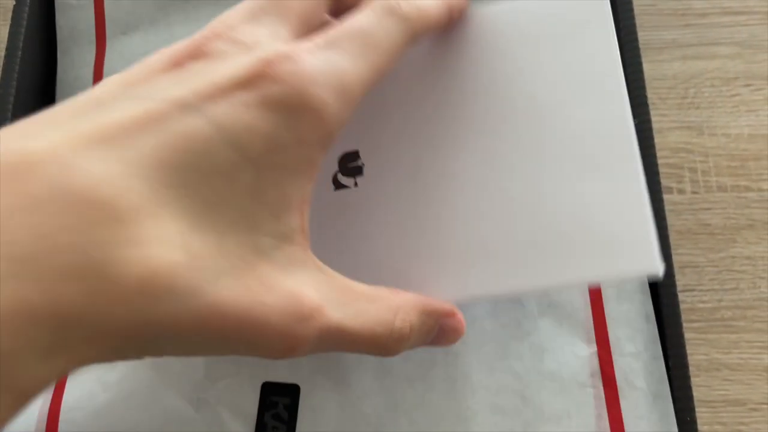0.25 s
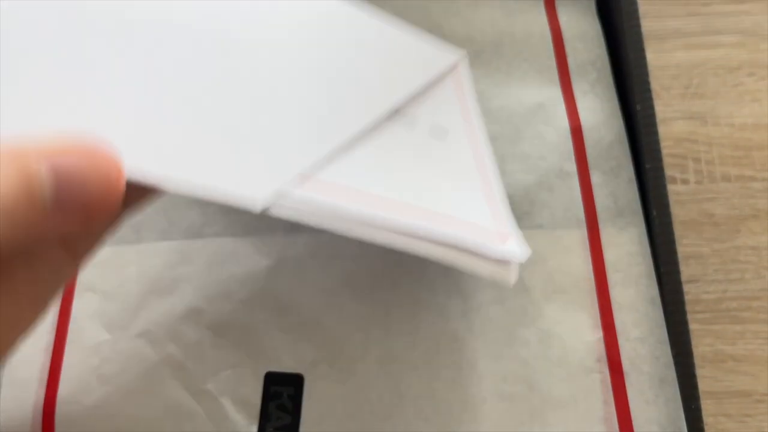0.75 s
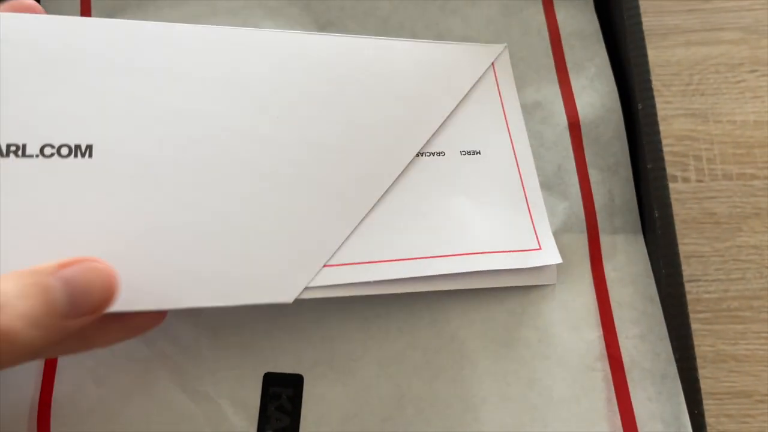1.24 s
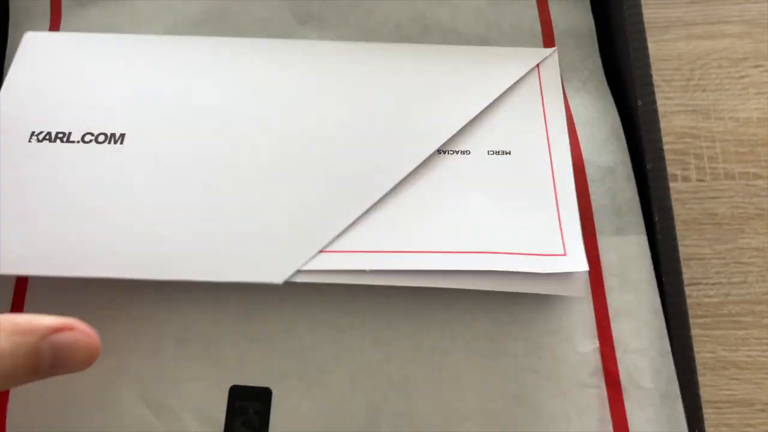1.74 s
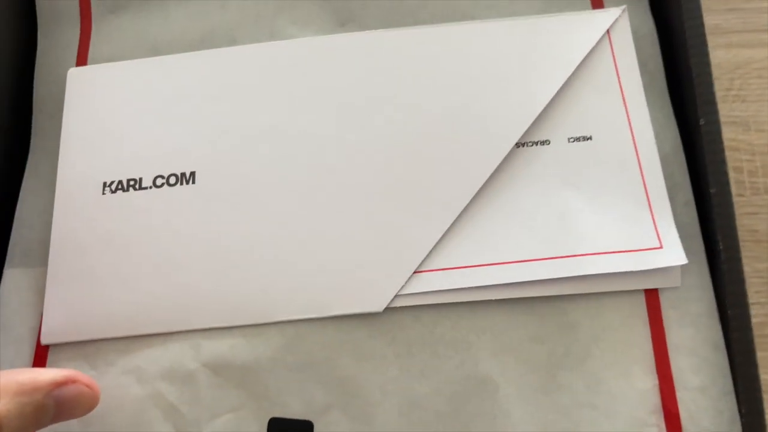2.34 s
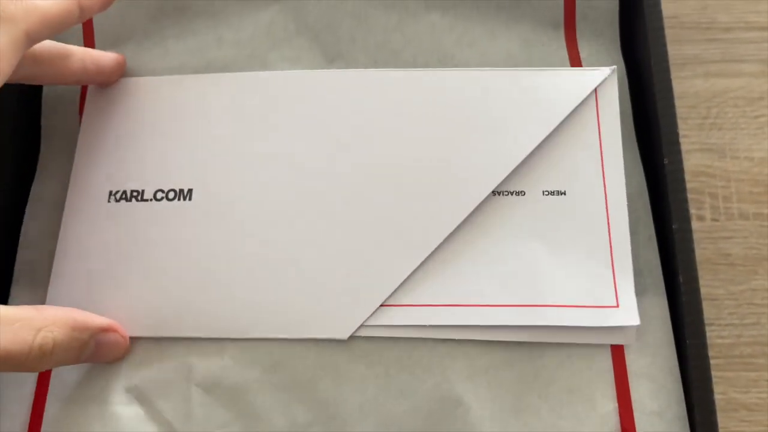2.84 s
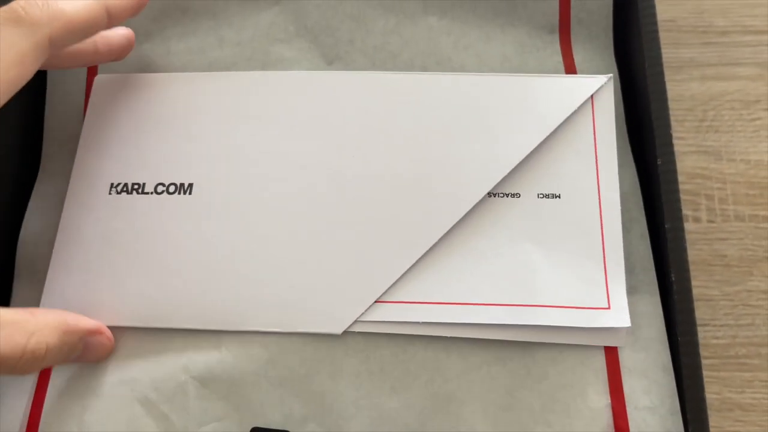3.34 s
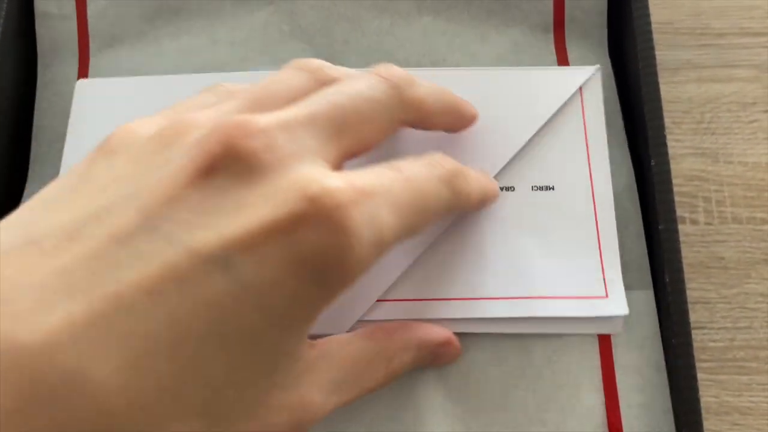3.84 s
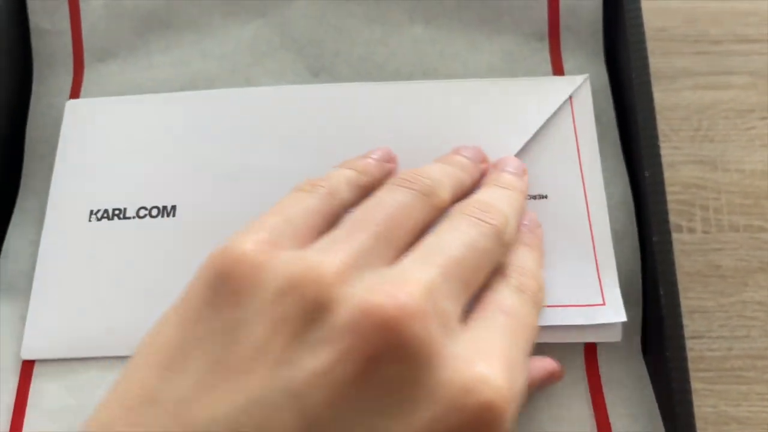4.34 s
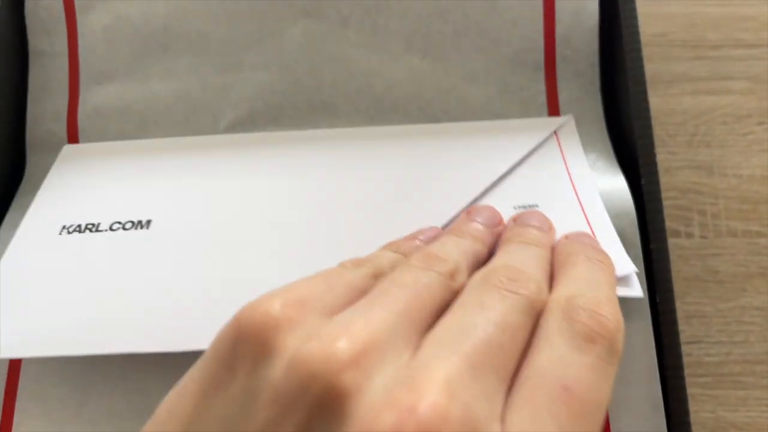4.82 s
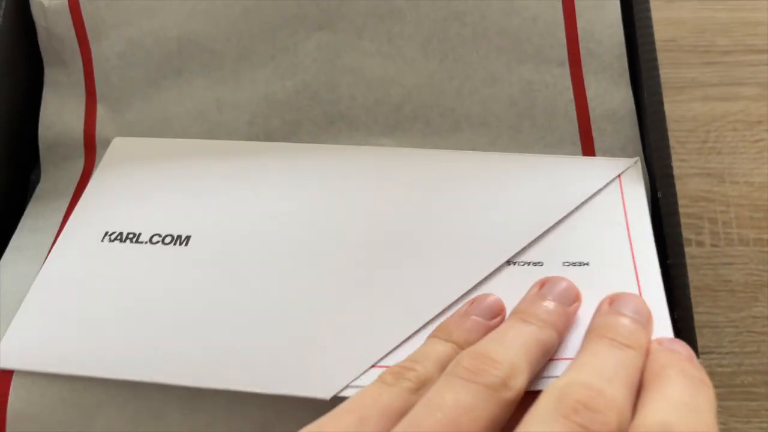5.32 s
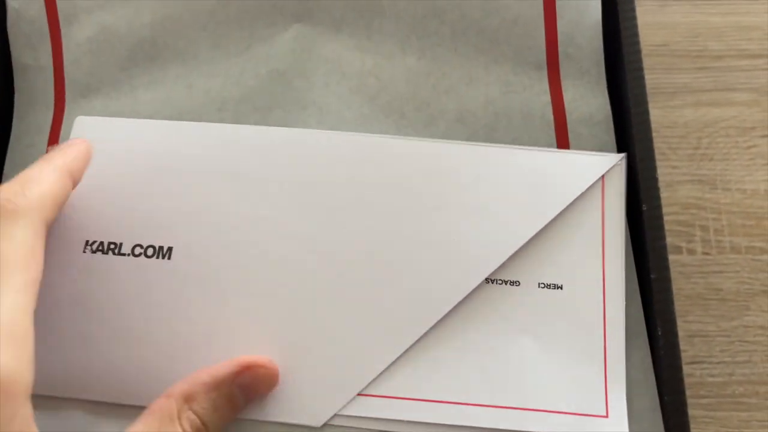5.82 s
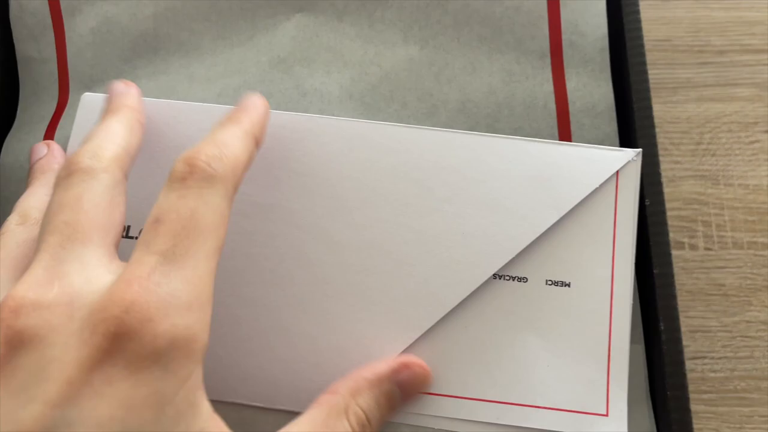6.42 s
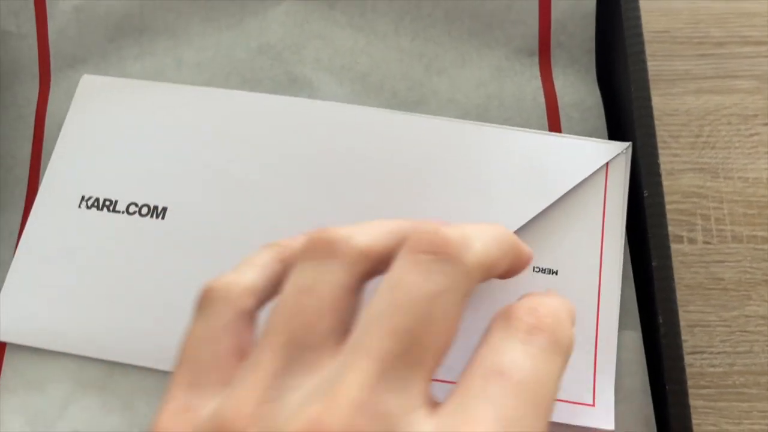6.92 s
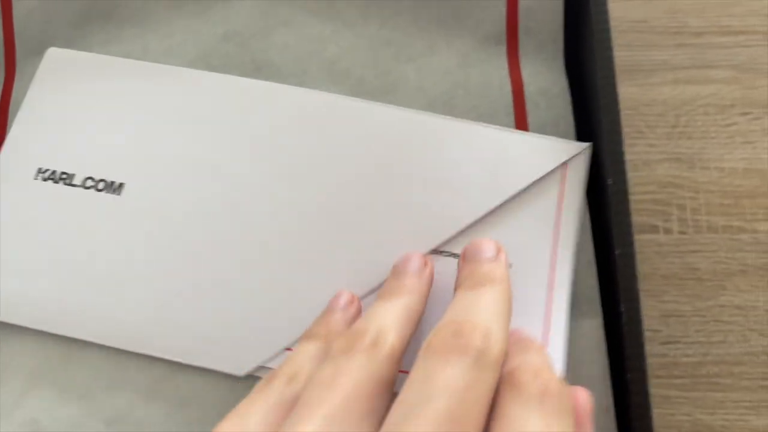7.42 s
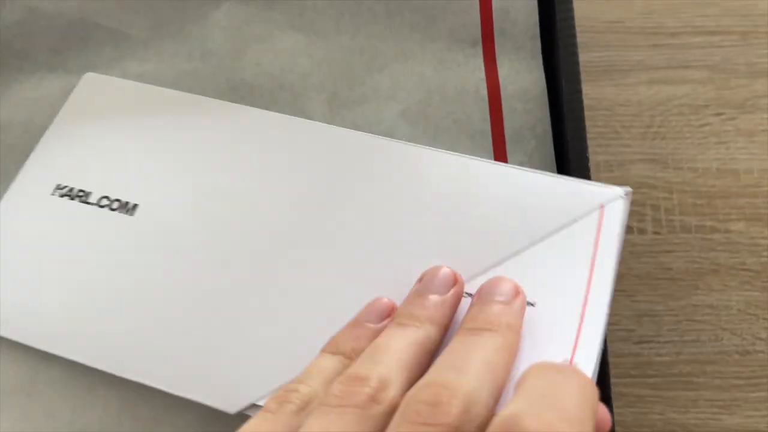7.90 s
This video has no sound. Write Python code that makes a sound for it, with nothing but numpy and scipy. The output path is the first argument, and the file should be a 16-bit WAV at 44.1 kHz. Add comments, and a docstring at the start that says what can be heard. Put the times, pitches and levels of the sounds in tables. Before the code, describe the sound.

A stiff card sleeve is lifted, flipped and set down on tissue, then rubbed and slid about with dry hisses, crisp crinkles and soft papery thumps.

```python
"""Sliding paper hisses and crinkles in short strokes: a hand lifts a stiff sleeve of cards off a tissue lining,
turns it over, lays it down and slides it about in a shallow box. Shaped noise makes the rub, noisy bursts make
creases snap and edges tap, and falling sines make the bowed sleeve pop through with a soft thump.
Landings ring as two sines; resonances stand for the box, a short noise tail for a small quiet room.
The pickup is close and wide, and the treble brightest near 9 kHz."""
import sys
import numpy as np
from scipy import signal
from scipy.fft import rfft, irfft, next_fast_len
from scipy.io import wavfile
from scipy.ndimage import uniform_filter1d, map_coordinates

SR = 44100
rng = np.random.default_rng(int(sys.argv[2]) if len(sys.argv) > 2 else 0)


def pcm_store(signal):
    """Save signal as 16-bit PCM."""
    levels = np.round(np.clip(np.atleast_2d(signal), -1, 1) * 32767)
    wavfile.write(sys.argv[1], SR, levels.astype(np.int16).T)


N = 359856
TOP_HZ = 16300  # band limit


def amp(db):
    """Decibels to gain."""
    return 10 ** (np.asarray(db) / 20)


def unit(x):
    """Scaled to rms 1."""
    return x / np.sqrt(np.mean(x ** 2) + 1e-20)


def along(points, hz):
    """Reads a curve of (Hz, value) points on a log frequency axis."""
    point_hz, value = np.transpose(points)
    return np.interp(np.log(hz + 1), np.log(point_hz + 1), value)


def at_time(points, seconds):
    """Reads a curve of (s, value) points with straight lines between them."""
    return np.interp(seconds, *np.transpose(points))


def wobble(rate):
    """A smooth random curve, rate knots a second."""
    knots = rng.standard_normal(int(N * rate / SR) + 4)
    return map_coordinates(knots, [np.arange(N) * rate / SR])


def filtered(x, response):
    """x times a complex response of frequency."""
    size = next_fast_len(N + SR // 2)
    hz = np.fft.rfftfreq(size, 1 / SR)
    return irfft(rfft(x, size) * response(hz), size)[..., :N]


def coloured(x, spectrum):
    """x through a (Hz, dB) spectrum, at rms 1."""
    return unit(filtered(x, lambda hz: amp(along(spectrum, hz))))


def causal(gain):
    """The minimum-phase response with this gain: it rings only after its cause."""
    cepstrum = irfft(np.log(np.maximum(gain, 1e-6)))
    half = len(cepstrum) // 2
    return np.exp(rfft(np.r_[cepstrum[0], 2 * cepstrum[1:half], np.zeros(half)]))


# spectrum shape of the room's still air: pitch_hz [Hz], density_db [dB per Hz]
AIR_COLOUR = [(20, -13), (55, -9.5), (110, -9.5), (200, -16), (500, -19.5), (1500, -29.5), (7000, -38.5),
              (8800, -32.5), (10300, -47), (14000, -66.5)]


def still_air():
    """Steady, faint noise weighted to the lows, with a small lift near 9 kHz."""
    return amp(-75.5) * coloured(rng.standard_normal((2, N)), AIR_COLOUR)


# how long the room rings: pitch_hz [Hz], t60_s [s]
ROOM_DECAY = [(100, 0.6), (500, 0.13), (3000, 0.21), (9000, 0.2), (15000, 0.48)]


def room(x):
    """A diffuse noise tail, 4 ms late, whose decay time depends on frequency."""
    hz, t, z = signal.stft(rng.standard_normal((2, SR // 2)), SR, nperseg=256)
    decay = amp(-60 * t / along(ROOM_DECAY, hz)[:, None])
    tail = signal.istft(z * decay, SR, nperseg=256)[1]
    tail = np.pad(tail / np.linalg.norm(tail[0]), ((0, 0), (SR // 250, 0)))
    return signal.fftconvolve(x[None], tail, axes=1)[:, :N]


# air and card resonances of the box: centre_hz [Hz], width_hz [Hz], lift_db [dB, before the low shelf]
BOX_RESONANCES = [(189.7, 39, 8), (300, 23, 5), (360, 15, 3), (410.5, 11, 6.5), (715, 50, 2),
                  (1140, 52, 3.5), (1326, 42, 5.5), (1526, 20, 5.5), (1780, 170, 2.5)]


def box(x):
    """The open box lifts a few narrow bands, over a gentle cut of up to 3.2 dB below about 2.2 kHz."""
    def gain(hz):
        lift_db = sum(db / (1 + (2 * (hz - centre) / width) ** 2) for centre, width, db in BOX_RESONANCES)
        shelf_db = -3.2 / (1 + (hz / 2200) ** 2)
        return amp(lift_db + shelf_db)
    return filtered(x, gain)


# the card bumping down on the lining: start_s [s], level_db [dB, nominal peak of the main ring], ring_hz [Hz]
LANDINGS = [(.8365, -29, 420), (2.036, -45, 376), (2.559, -40, 527), (2.58, -38.5, 538), (2.617, -46, 580),
            (2.832, -34, 500), (2.897, -43, 650), (2.916, -46, 737), (3.732, -42, 660), (4.31, -41, 258)]
BUMP_RISE_S, BUMP_T60_S = 0.00084, 0.037
BUMP_LOW_RATIO, BUMP_LOW_DB = .62, -9  # a slower bending of the card, re the main ring


def bumps():
    """The card lands softly on the tissue and rings briefly in two bending modes."""
    out, t = np.zeros(N + SR), np.arange(SR // 2) / SR
    for start_s, level_db, ring_hz in LANDINGS:
        phase = 2 * np.pi * ring_hz * t
        ring = np.sin(phase) + amp(BUMP_LOW_DB) * np.sin(BUMP_LOW_RATIO * phase)
        envelope = (1 - np.exp(-t / BUMP_RISE_S)) * amp(level_db - 60 * t / BUMP_T60_S)
        out[round(start_s * SR):][:len(t)] += envelope * ring
    return out[:N]


# the sleeve popping through: start_s [s], level_db [dB, 2.5 dB is added before the decay],
# first_hz [Hz], settled_hz [Hz], t60_s [s]
POP_THROUGHS = [(0.827, -37.5, 174, 63, 0.3), (1.548, -33.5, 185, 68.6, 0.32),
                (1.653, -44.5, 106.8, 69.4, 0.49), (5.953, -36, 182, 75.5, 0.22),
                (6.374, -33, 176, 77, 0.11)]


def pops():
    """Bending waves run faster when short, so each pop slides down to the sleeve's slow flap."""
    out, t = np.zeros(N + SR), np.arange(SR // 2) / SR
    for start_s, level_db, first_hz, settled_hz, t60_s in POP_THROUGHS:
        pitch_hz = settled_hz + (first_hz - settled_hz) * np.exp(-(t / 0.0099) ** 2)
        swell = 1 - np.exp(-(t / 0.0051) ** 2)
        decay = amp(level_db + 2.5 - 60 * t / t60_s)
        thump = np.sin(2 * np.pi * np.cumsum(pitch_hz) / SR)
        out[round(start_s * SR):][:len(t)] += swell * decay * thump
    return out[:N]


# small creases that give way by chance while paper moves
STRAY_PER_S, STRAY_DB, STRAY_SPREAD_DB = 36, 7, 4.5  # rate; level over the stroke and its +/- scatter
STRAY_BODY_DB, STRAY_KNOCK_DB, STRAY_TINT_DB = 1, 3.5, 5.5  # colour re the stroke's and its +/- scatter
STRAY_BUCKLING_S, STRAY_FACET_HZ = 0.00025, 2780  # middle values, scattered up to an octave either way


def stray_creases(hiss_db, scrape_db, flex_db, count=400):
    """Snaps at random moments, with level and colour set by the stroke that bends the paper."""
    times = np.cumsum(rng.exponential(size=count)) / STRAY_PER_S
    times = times[times < (N - 1) / SR]
    scatter = 2 * rng.random((count, 5)) - 1
    rows = []
    for start_s, (strength, body, knock, length, facet) in zip(times, scatter):
        i = int(start_s * SR)
        stroke_db = (hiss_db[i] + scrape_db[i]) / 2
        level_db = stroke_db + STRAY_DB + STRAY_SPREAD_DB * strength
        body_db = scrape_db[i] - stroke_db + STRAY_BODY_DB + STRAY_TINT_DB * body
        knock_db = flex_db[i] - stroke_db + STRAY_KNOCK_DB + STRAY_TINT_DB * knock
        buckling_s, facet_hz = STRAY_BUCKLING_S * 2 ** length, STRAY_FACET_HZ * 2 ** facet
        rows.append((start_s, level_db, body_db, knock_db, buckling_s, facet_hz))
    return rows


# creases snapping and edges tapping: start_s [s], level_db [treble dB over 1 ms, before a 3 dB cut],
# body_db [dB re treble, before a 6.5 dB cut], knock_db [dB re treble, before an 8 dB cut],
# buckling_s [s], facet_hz [Hz, ring of the facet]
CREASES = [(.1166, -26, 5.5, 1.5, .0014, 2150), (.1274, -41, 3, 0, .0003, 7280),
           (.1705, -28, 1.5, -1, .002, 5560), (.2205, -29.5, 1, -6, .0007, 6900),
           (.4815, -33.5, -1, -2, .0008, 7100), (.4896, -40, 5, 3, .0006, 7300),
           (.724, -38, 7, 6, .0028, 7190), (.738, -24, -3, 0.5, .00066, 5900),
           (.7445, -26.5, 5.5, -2.5, .00095, 4460), (.836, -16, 4.5, -1, .0013, 8050),
           (.8392, -23, 7, 3, .0038, 7300), (1.0704, -36, 3, -1, .00094, 5600),
           (1.3636, -24.5, -4, -18, .0003, 1810), (1.3714, -21.5, 4, -0.5, .002, 1570),
           (1.5567, -36, 2, 1, .00069, 4260), (1.5616, -48, 15, 6, .0005, 2020),
           (1.631, -39, 2, -5, .00069, 5470), (1.641, -34, 5.5, 3, .0015, 1610),
           (1.6642, -39.5, 8.5, 11.5, .00076, 1100), (1.6798, -31.5, -6, 6, .00052, 4350),
           (1.7863, -34, 4, 3, .00077, 3420), (1.988, -28, -1.5, 0.5, .00067, 5400),
           (2.0038, -31.5, 2.5, 4, .0005, 1850), (2.0314, -32, -0.5, -5, .0006, 6900),
           (2.039, -52, 15, 16, .0004, 810), (2.068, -52, 15.5, 10, .00077, 1010),
           (2.1985, -60, 14, 17, .0012, 1010), (2.5823, -33.5, 4.5, -3, .0012, 7300),
           (2.8332, -30, 3, 1, .0005, 1960), (2.8965, -26, -3, -3.5, .00059, 4300),
           (3.1592, -36.5, -8, -16, .00044, 2630), (3.1786, -36.5, 1.5, -4, .0008, 6900),
           (3.3004, -51.5, 12.5, 5, .00055, 2670), (3.432, -69.5, 17, 20, .0024, 1380),
           (3.708, -48, 11, 12, .0007, 2375), (3.7257, -39, 10, 6, .0014, 4690),
           (3.7572, -34, 5.5, -3, .00053, 6070), (3.7705, -26.5, 1, 1.5, .00056, 7100),
           (3.8884, -36, -1.5, -1, .00093, 1740), (4.0799, -30.5, 1.5, -2, .0005, 3770),
           (4.1054, -20, 0, -5.5, .0012, 2440), (4.1747, -49, 18, 20.5, .0003, 1330),
           (4.1816, -37.5, 5, 7, .00034, 1140), (4.2145, -28.5, 8, 5, .0014, 2800),
           (4.233, -42, 12, -2, .0008, 2240), (4.265, -33.5, 10.5, 6, .0021, 2900),
           (4.307, -40, 11, 10.5, .001, 497), (4.3678, -49.5, 15.5, 16, .00049, 5000),
           (4.3788, -51.5, 20, 11.5, .0003, 1780), (4.4432, -37.5, 9, 3.5, .0005, 5000),
           (4.4566, -39, 4, -9, .0006, 2560), (4.4848, -42.5, 3, 4, .0003, 1380),
           (4.4963, -15.5, -6, -8, .00025, 7800), (4.5215, -18.5, -2.5, -3.5, .0002, 5400),
           (4.5884, -32, -10, -2.5, .00017, 4590), (4.6087, -36.5, 11, -0.5, .0004, 4500),
           (4.6164, -24.5, -1, -2, .0013, 1560), (4.629, -28.5, 3, 5, .0016, 3300),
           (4.69, -36, 7, 6, .002, 2700), (4.7168, -47, 12, 5, .0004, 1980),
           (4.7765, -11, -3, -9, .00016, 8800), (4.9008, -24, .5, -5.5, .0011, 3900),
           (4.9546, -39, 13.5, 1, .0028, 1980), (5.0347, -22.5, 11, -14.5, .00006, 3900),
           (5.0613, -34.5, -2, -16, .0003, 5210), (5.0888, -20.5, -2.5, -8.5, .0003, 4850),
           (5.1015, -38, 6, -6.5, .0005, 5380), (5.164, -42, 12, -1, .0004, 6550),
           (5.186, -46, 13, 9, .0006, 4610), (5.3381, -38.5, 0, -14, .0006, 1960),
           (5.3695, -34.5, -2, -14, .00055, 2310), (5.3886, -36.5, 4, -10, .0006, 6610),
           (5.4184, -30.5, -3, 0, .00047, 1530), (5.4373, -27, 0.5, 0, .0006, 4430),
           (5.4448, -28.5, 3, -18, .00048, 6830), (5.4494, -28.5, -5, -9, .00057, 7100),
           (5.6109, -45.5, 1, -1, .00082, 4280), (5.7342, -42.5, 3.5, 2.5, .00035, 2690),
           (5.7737, -27.5, -1.5, -25, .00055, 4830), (5.783, -31, 4, -7, .0026, 3100),
           (5.9224, -40.5, 3, -7, .0005, 4100), (5.9826, -35, 0.5, -7, .00073, 3060),
           (6.0914, -40, 3, 0, .00081, 7040), (6.2905, -35, 7, -16, .0004, 1980),
           (6.3059, -32.5, -1, 5, .00039, 825), (6.313, -32.5, -2, 0.5, .0005, 2500),
           (6.3468, -38, -3, 2, .0004, 4590), (6.4356, -51, 12, 14, .00067, 2300),
           (6.5335, -42.5, 7, -4, .001, 5730), (6.628, -49.5, 13, 15.5, .00061, 1510),
           (6.7062, -65, 15, 19, .0005, 2160), (7.0, -65.5, 15, 20, .001, 4110),
           (7.0174, -73, 15.5, 21, .0006, 820), (7.1945, -71, 13, 12, .0005, 1890),
           (7.4284, -35, 2, -.5, .0007, 1150), (7.5378, -19.5, -1, -6, .0012, 2670),
           (7.6764, -26, -1, -11, .00067, 1860), (7.7022, -32, 7, -3, .00047, 6100),
           (7.7284, -29.5, 6, 0, .00083, 1250), (7.841, -24, -8, -3, .0003, 1010),
           (7.8469, -33, 7.5, 3.5, .0009, 900), (8.0245, -24, 0, -10, .00087, 5370),
           (8.1559, -29, 4, -2, .0008, 7200)]
# where on the sheet the creases give way: time_s [s], lean [-1 right to 1 left]
CREASE_LEAN = [(.1, 0.078), (.6, 0.39), (.85, -.25), (1.37, -.25), (1.7, 0.3), (3.3, 0.5), (4.1, -0.28),
               (5.0, .3), (5.8, 0.16), (7.5, 0.64)]
# added treble of the snaps above 11 kHz: pitch_hz [Hz], lift_db [dB]
SNAP_TREBLE_LIFT = [(11000, 0), (12500, 10), (16000, 5)]
# spectrum shapes of snapping paper (the treble also colours the hiss): pitch_hz [Hz], density_db [dB per Hz]
TREBLE_COLOUR = [(3500, -27), (5500, -5), (6800, -4), (7700, 2.5), (8800, 6), (9500, 5), (10200, -2.5),
                 (11000, -7.5), (12000, -26.5), (13200, -43.5), (15200, -39.5), (16300, -43)]
BODY_COLOUR = [(500, -30), (1000, -14.5), (1500, -6), (2000, 5), (3200, 4), (5200, 2.5), (6500, -1),
               (8500, -14.5), (11000, -52)]
KNOCK_COLOUR = [(60, -28.5), (150, -16), (300, 0), (700, 6.5), (1100, 5.5), (1600, -0.5), (3000, -48.5)]
FACET_DB, FACET_Q = 8, 7  # how far a facet's ring stands out, and its sharpness
FIRST_JUMP = 7.2  # base size of the first clean jump, re the noisy burst that follows
CLEAN_JUMP_S = 0.00013  # the jump grows steeply when buckling is quicker than this


def snaps(rows, size=4096):
    """A crease gives way in a short burst that rings its facet of the sheet; low bending lasts longest."""
    t, hz = np.arange(size) / SR, np.fft.rfftfreq(size, 1 / SR)
    colours = (TREBLE_COLOUR, BODY_COLOUR, KNOCK_COLOUR)
    treble, body, knock = [unit(amp(along(colour, hz))) for colour in colours]
    shiver, bending = amp(-4.5 - 60 * t / 0.027), amp(-2.5 - 60 * t / 0.061)
    out = np.zeros((2, N + size))
    noises = rng.standard_normal((len(rows), 2, size))
    for (start_s, level_db, body_db, knock_db, buckling_s, facet_hz), noise in zip(rows, noises):
        burst = np.exp(-(t / (4.2 * buckling_s)) ** 2)
        ring_db = FACET_DB / (1 + (2 * FACET_Q * (hz / facet_hz - 1)) ** 2)
        facet = amp(ring_db + along(SNAP_TREBLE_LIFT, hz))
        bright = np.hypot(treble, amp(body_db - 6.5) * body)
        low = amp(knock_db - 8.0) * knock
        lean = at_time(CREASE_LEAN, start_s)
        for tail, colour in (shiver, facet * bright), (bending, facet * low):
            drive = noise * (burst + tail)
            drive[0, 0] += FIRST_JUMP * (1 + (CLEAN_JUMP_S / buckling_s) ** 2)
            crack = irfft(rfft(drive) * causal(colour))
            energy = np.mean(colour ** 2) * SR / 1000  # as if the level held for 1 ms
            crack *= np.sqrt(energy / np.sum(crack ** 2, axis=1, keepdims=True))
            # a side signal that resembles the middle pulls the snap to one side
            crack[1] = lean * crack[0] + np.sqrt(1 - lean ** 2) * crack[1]
            out[:, min(round(start_s * SR), N):][:, :size] += amp(level_db - 3.0) * crack
    return out[:, :N]


# strokes of paper on paper: start_s [s], attack_s [s, speeding up], hold_s [s], t60_s [s, coming to rest],
# hiss_db [dB, before a 2.5 dB cut], scrape_db [dB, pressed paper], flex_db [dB, bending card]
HAND_STROKES = [(-.02, 0.014, .14, .07, -50.5, -53.5, -55.5), (0.112, 0.07, 0.036, .36, -46, -49, -50.5),
                (0.242, 0.06, 0.11, 0.23, -43.5, -51.5, -56), (0.486, 0.02, .05, .2, -58.5, -62, -68),
                (0.582, 0.027, 0.036, 0.25, -53, -66, -77), (0.72, 0.014, 0.12, 0.45, -38, -44, -44),
                (0.971, .055, .045, 0.22, -56.5, -59, -63), (1.137, 0.0117, 0.01, .6, -58.5, -63, -58),
                (1.211, 0.045, 0.15, 0.21, -48, -54.5, -62), (1.326, 0.054, .005, 0.343, -41, -46, -50),
                (1.5, 0.0072, 0.026, 0.37, -48, -48, -53), (1.623, 0.016, 0.039, 0.32, -48.5, -49.5, -50),
                (1.748, 0.0336, 0.0055, 0.67, -53, -58.5, -59),
                (1.833, 0.11, 0.06, 0.19, -46.5, -56, -60.5),
                (1.978, 0.0098, 0.034, 0.33, -55.5, -51, -50.5),
                (2.075, 0.04, 0.056, 0.34, -93, -76.5, -65), (2.548, 0.017, 0.0091, 0.3, -53.5, -51.5, -50),
                (2.602, 0.064, .15, 0.37, -57, -64, -63), (2.794, 0.012, 0.03, .2, -58.5, -57, -53),
                (2.873, .02, 0.055, 0.65, -53.5, -58, -59.5), (3.003, 0.025, .04, 0.215, -56.5, -60, -65),
                (3.107, 0.025, .03, 0.5, -63, -65, -69), (3.298, 0.0069, .015, 0.2, -74.5, -68, -65.5),
                (3.681, 0.052, 0.0275, 0.87, -48, -50.5, -51.5), (3.977, .13, .006, 0.23, -51, -57.5, -54),
                (4.158, 0.036, .06, 0.86, -45, -51, -53.5), (4.356, 0.044, 0.1, 0.28, -52, -52, -56.5),
                (4.495, .03, 0.02, 0.34, -43, -44, -49.5), (4.586, 0.018, 0.096, .9, -47.5, -53.5, -55.5),
                (4.782, 0.014, 0.029, 1.4, -44.5, -48.5, -80), (5.046, 0.022, .03, 0.69, -43.5, -49.5, -61),
                (5.196, 0.05, 0.052, .35, -51.5, -55.5, -64.5), (5.342, .025, 0.037, 0.25, -52, -55.5, -63),
                (5.396, 0.042, 0.026, 0.27, -42, -44.5, -51.5),
                (5.578, 0.028, 0.0055, 0.098, -66.5, -58, -69), (5.755, 0.03, 0.0046, 0.48, -43, -47, -55),
                (5.907, 0.0138, 0.091, 0.34, -50.5, -55.5, -62.5),
                (6.259, 0.017, 0.018, 0.17, -46, -45.5, -53),
                (6.298, 0.0237, 0.081, 0.53, -56.5, -57.5, -57.5),
                (6.45, 0.089, 0.013, 0.2, -50, -54.5, -58.5), (6.547, 0.024, 0.022, .35, -69.5, -57.5, -54),
                (6.671, .01, .015, .25, -82, -67.5, -77), (6.956, .08, 0.018, 0.77, -78, -73.5, -78),
                (7.057, .03, 0.067, .11, -67, -75, -75.5), (7.208, 0.037, .115, .29, -55.5, -66.5, -75),
                (7.351, 0.03, 0.039, 0.14, -45.5, -58, -72), (7.432, 0.032, .04, .2, -64.5, -67.5, -71),
                (7.509, 0.029, 0.19, .14, -44, -55, -62), (7.68, .022, .01, 0.68, -47, -47.5, -49),
                (7.808, 0.034, 0.043, 0.625, -47.5, -53.5, -53),
                (7.981, 0.029, 0.021, 0.95, -53, -54, -53.5)]
UNSTEADY_DB, UNSTEADY_PER_S = 1.0, 28  # the hand's pressure wavers within a stroke


def handling():
    """Hiss, scrape and flex levels in dB: strokes gather speed, hold and die away under a wavering hand."""
    t, power = np.arange(N) / SR, np.full((3, N), 1e-12)
    for start_s, attack_s, hold_s, t60_s, *levels_db in HAND_STROKES:
        now = slice(*np.searchsorted(t, [start_s, start_s + attack_s + hold_s + t60_s]))
        age = t[now] - start_s
        slowing = amp(-60 * np.maximum(age - attack_s - hold_s, 0) / t60_s)
        speed = np.clip(age / attack_s, 0, 1) * slowing
        power[:, now] += np.outer(amp(levels_db), speed) ** 2
    return 10 * np.log10(power) + UNSTEADY_DB * wobble(UNSTEADY_PER_S)


def crinkles(rate, spread_db, life):
    """Power of many tiny buckles of random size, each dying within milliseconds; mean 1."""
    happens = rng.random(N) < rate / SR
    sizes = amp(spread_db * np.minimum(rng.standard_normal(N), 1.4)) * happens
    power = signal.lfilter([1], [1, -np.exp(-1 / (life * SR))], sizes ** 2)
    return power / power.mean()


def patchy(x, depth_db):
    """The sheet's shape keeps changing, so narrow ranges swell and sink for a few tens of milliseconds."""
    z = signal.stft(x, nperseg=512)[2]
    field = uniform_filter1d(rng.standard_normal(z.shape[1:]), size=4, axis=0)  # across frequency
    field = uniform_filter1d(field, size=7, axis=1)  # across time
    return signal.istft(z * amp(depth_db * unit(field)), nperseg=512)[1][:, :N]


# the air gap under the card, pressed ever flatter: time_s [s], resonance_hz [Hz]
AIR_GAP = [(4.791, 609), (4.87, 1050), (4.95, 1450), (5.04, 1770)]
GAP_Q, GAP_DEPTH, GAP_FADE_S = 1.1, 0.6, .02  # sharpness; share of the rub leaving through it; fade in and out


def through_gap(x):
    """The flattening gap is a resonant high-pass that climbs, so the rub thins from below."""
    hz, t, z = signal.stft(x, SR, nperseg=512)
    gap_s = np.transpose(AIR_GAP)[0]
    ratio = hz[:, None] / at_time(AIR_GAP, t)
    gain = ratio ** 2 / np.hypot(1 - ratio ** 2, ratio / GAP_Q)
    fade = np.clip(np.minimum(t - gap_s[0], gap_s[-1] - t) / GAP_FADE_S, 0, 1)
    share = GAP_DEPTH * fade
    return signal.istft(z * (1 - share + share * gain), SR, nperseg=512)[1][:, :N]


# low rumble as the whole sleeve is moved: time_s [s], level_db [dB]
SLEEVE_SWAY = [(0, -59), (.7, -65.5), (1.25, -66), (1.45, -50), (1.7, -58), (1.95, -69), (2.5, -72.5),
               (2.92, -65), (3.55, -73.5), (4.3, -63.5), (4.9, -76), (5.7, -78.5), (6.05, -53.5),
               (6.22, -81.5), (6.35, -57), (6.85, -82), (7.4, -78), (8.1, -60)]
# spectrum shapes of pressed rub, bending card and low rumble: pitch_hz [Hz], density_db [dB per Hz]
SCRAPE_COLOUR = [(400, -24.5), (750, 2.5), (1100, 3), (1500, 3), (1950, 4.5), (3000, 4), (4000, 1),
                 (5200, -0.5), (6500, -5.5), (8500, -16.5), (11000, -43)]
FLEX_COLOUR = [(70, -33), (130, -1), (185, 2.5), (260, 1.5), (420, -0.5), (560, -0.5), (780, -3.5),
               (1100, -5.5), (2200, -53)]
RUMBLE_COLOUR = [(20, -27.5), (35, -9.5), (50, 0.5), (75, 5), (110, -1.5), (160, -4), (300, -55)]
FLEX_AIR_DB = -11.5  # air pushed by the flexing card, re its own sound


def sliding(hiss_db, scrape_db, flex_db):
    """Fibres rub into a hiss; the harder the paper is pressed, the more of it is crinkle."""
    sway_db = at_time(SLEEVE_SWAY, np.arange(N) / SR)
    moving = np.clip((scrape_db + 87.5) / 16, 0, 1)  # paper at rest does not buckle
    share = moving * np.clip(0.63 + 0.044 * (scrape_db - hiss_db), .05, .92)
    grains = crinkles(rate=480, spread_db=8.0, life=0.0017)
    grip = amp(2.0 * share * wobble(90))  # a pressed contact catches and lets go
    texture = grip * np.sqrt(1 - share + share * grains)

    def rub(colour):
        return coloured(patchy(rng.standard_normal((2, N)) * texture, depth_db=2), colour)

    hiss = amp(hiss_db - 2.5) * rub(TREBLE_COLOUR)
    scrape = amp(scrape_db) * rub(SCRAPE_COLOUR)
    flex = amp(flex_db) * rub(FLEX_COLOUR)
    rumble_gain = np.hypot(amp(sway_db), amp(flex_db + FLEX_AIR_DB))
    rumble = rumble_gain * coloured(rng.standard_normal((2, N)), RUMBLE_COLOUR)
    return hiss + through_gap(scrape + flex) + rumble


def dispersed(x):
    """Low bending waves cross the sheet later than high ones: delay goes as one over root frequency."""
    # crossing time at this frequency; the crossing time at TOP_HZ is subtracted below
    delay_s, at_hz = .0006, 1000

    def lag(hz):
        cycles = delay_s * (2 * np.sqrt(at_hz * hz) - hz * np.sqrt(at_hz / TOP_HZ))
        return np.exp(-2j * np.pi * cycles)
    return filtered(x, lag)


# likeness of the two sides: pitch_hz [Hz], likeness [correlation, 1 is the same]
SIDES_ALIKE = [(60, .98), (300, .97), (700, .87), (1400, .68), (3000, .64), (6000, .68), (8500, .95),
               (12000, .93)]


def ports(pair):
    """A middle and a side signal become a left and a right that are partly alike."""
    def weights(hz):
        turn = np.arccos(np.clip(along(SIDES_ALIKE, hz), -1, 1)) / 2
        return np.array([np.cos(turn), np.sin(turn)])
    mid, side = filtered(pair, weights)
    return np.array([mid + side, mid - side])


def scene():
    """Paper in the box, the room's answer and its still air."""
    levels = handling()
    paper = dispersed(sliding(*levels) + snaps(CREASES) + snaps(stray_creases(*levels)))
    paper[0] += pops() + bumps()  # in the middle: the long waves reach both ports alike
    return ports(box(paper) + amp(-18) * room(paper[0]) + still_air())


# level of left over right: pitch_hz [Hz], level_db [dB]
LEFT_OVER_RIGHT = [(60, 2), (200, 2.2), (380, 1.1), (700, 3.8), (1300, 2.6), (4400, 2.2), (8100, .7),
                   (12000, -.6)]
# phase by which left leads right: pitch_hz [Hz], lead_rad [radians]
LEFT_LEAD = [(100, 0), (1900, .1), (2750, 1.4), (3800, .5), (7600, .7), (8600, 0), (10000, -2.8),
             (12700, -7), (15000, -12)]


def record(dry):
    """The two ports differ in level and phase; nothing is kept above the band limit."""
    sides = np.array([[.5], [-.5]])  # each port takes half the difference

    def pickup(hz):
        return amp(sides * along(LEFT_OVER_RIGHT, hz)) * np.exp(1j * sides * along(LEFT_LEAD, hz))
    heard = filtered(dry, pickup)
    return filtered(heard, lambda hz: hz < TOP_HZ)


dry = scene()
out = record(dry)
pcm_store(out)
```